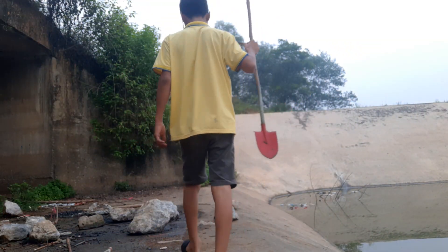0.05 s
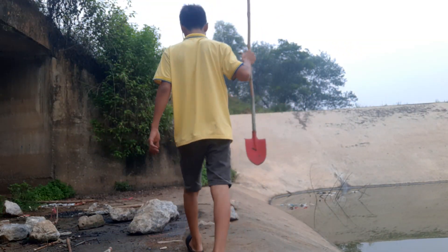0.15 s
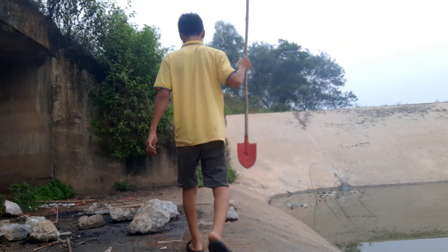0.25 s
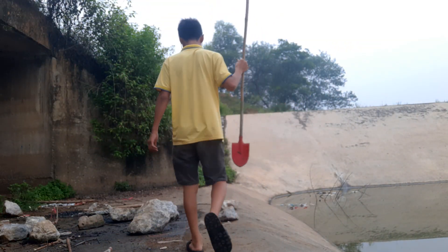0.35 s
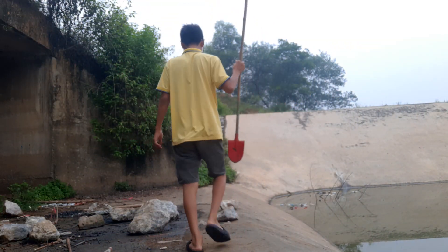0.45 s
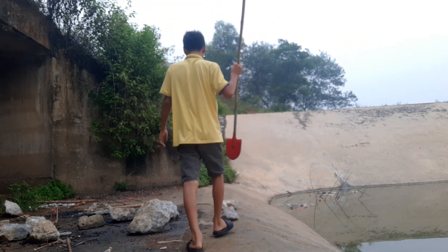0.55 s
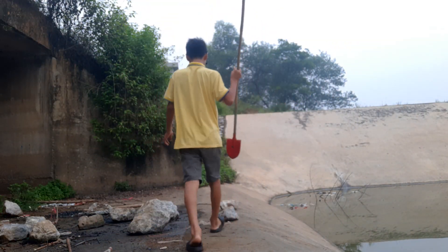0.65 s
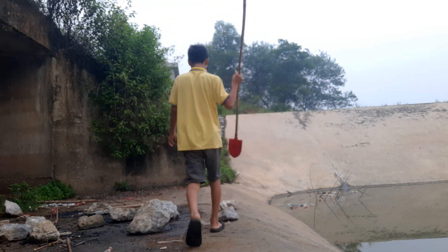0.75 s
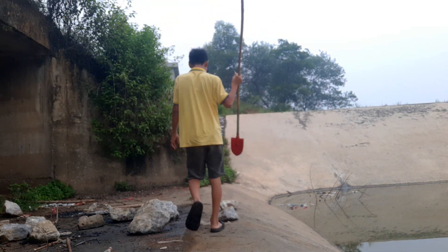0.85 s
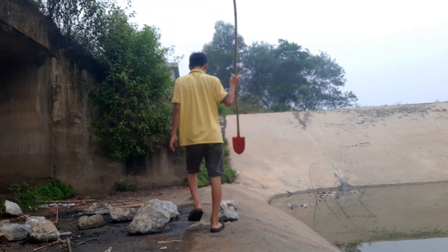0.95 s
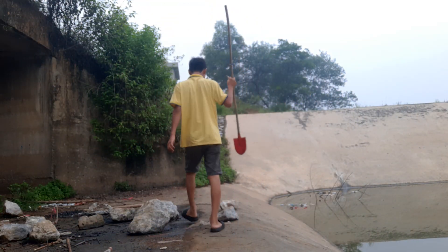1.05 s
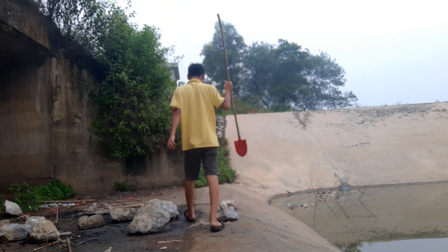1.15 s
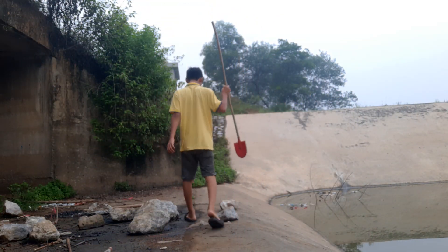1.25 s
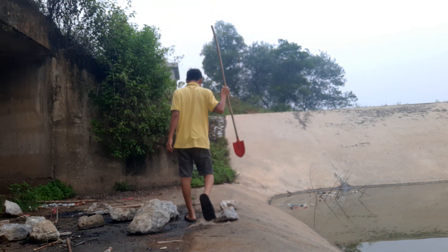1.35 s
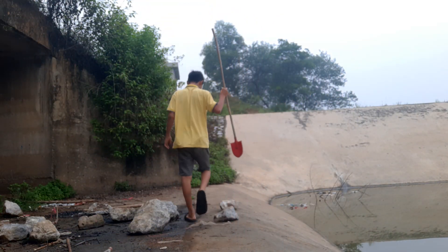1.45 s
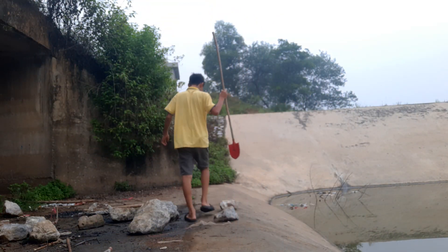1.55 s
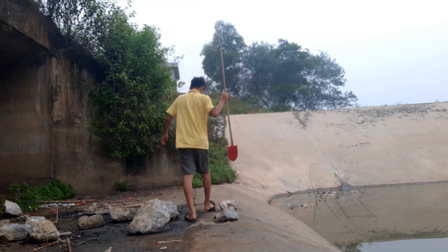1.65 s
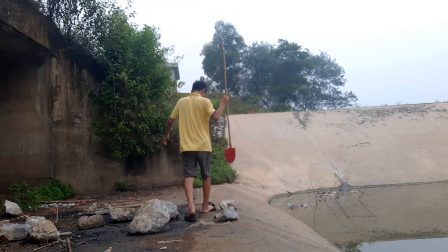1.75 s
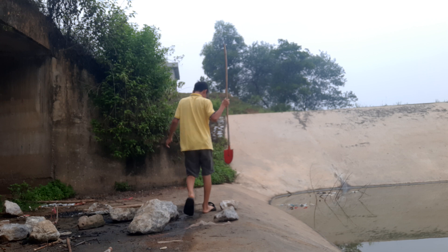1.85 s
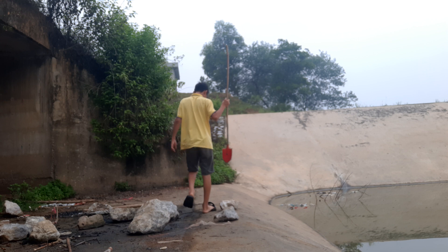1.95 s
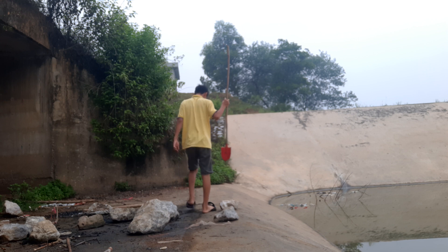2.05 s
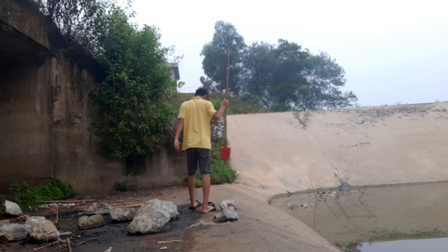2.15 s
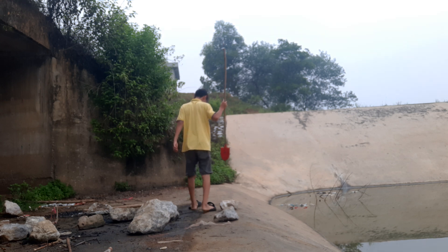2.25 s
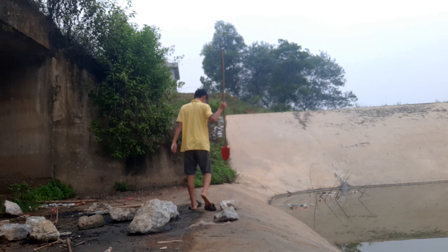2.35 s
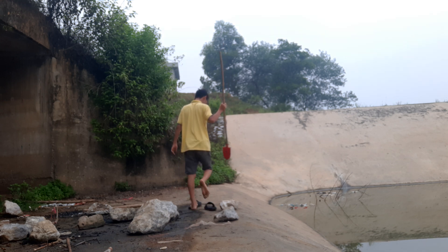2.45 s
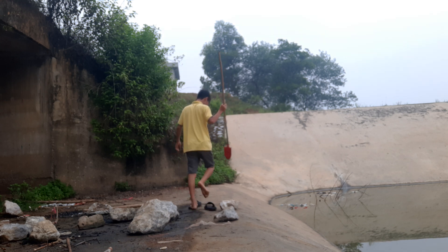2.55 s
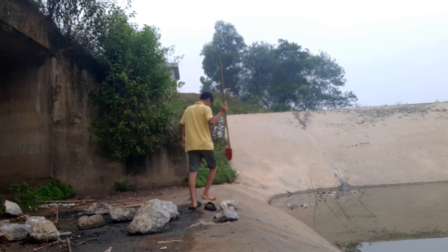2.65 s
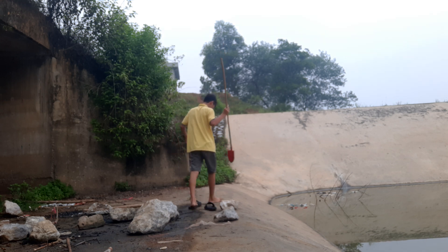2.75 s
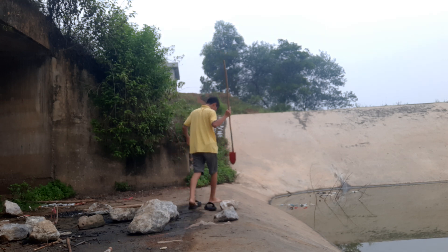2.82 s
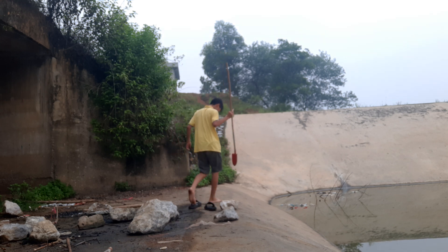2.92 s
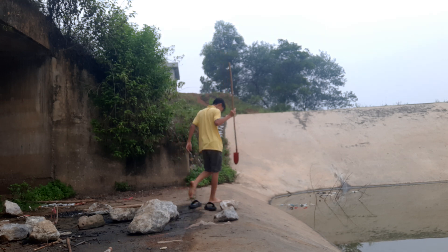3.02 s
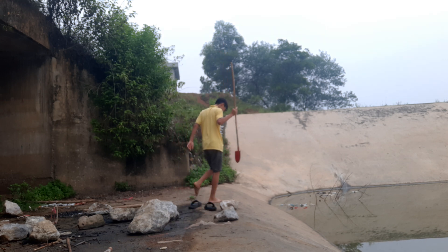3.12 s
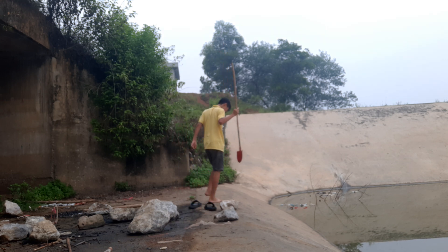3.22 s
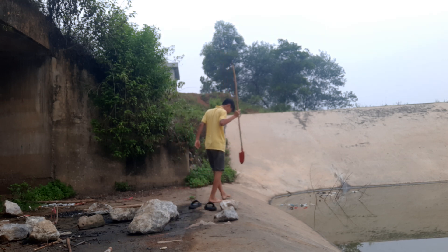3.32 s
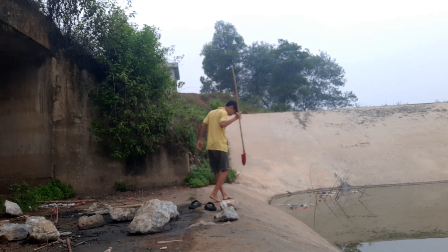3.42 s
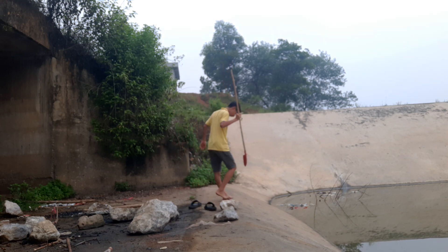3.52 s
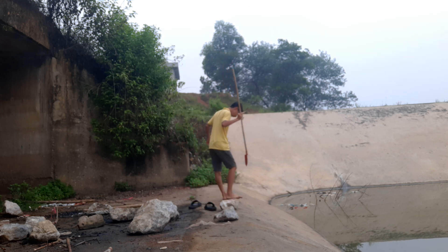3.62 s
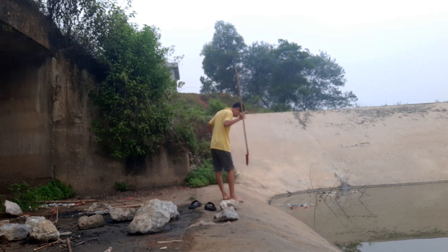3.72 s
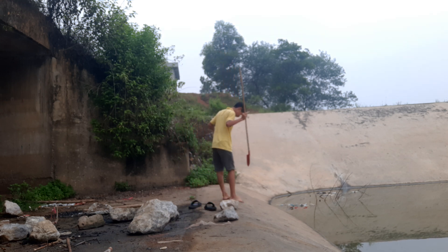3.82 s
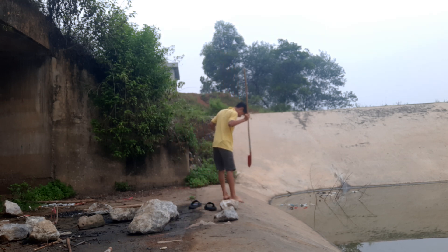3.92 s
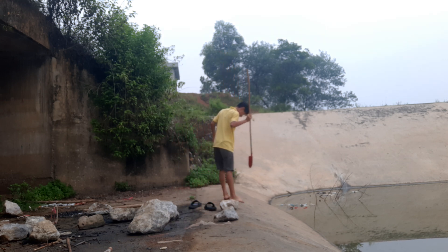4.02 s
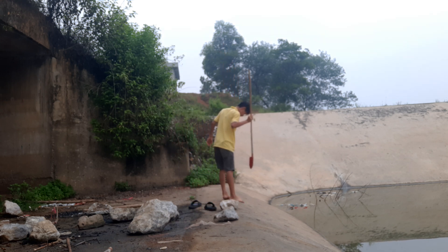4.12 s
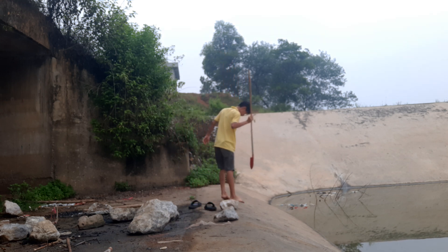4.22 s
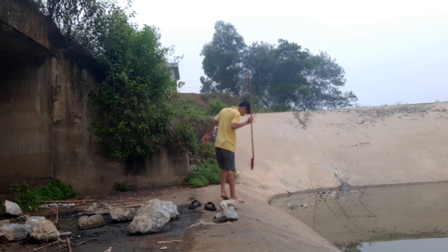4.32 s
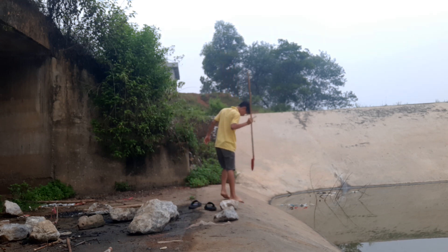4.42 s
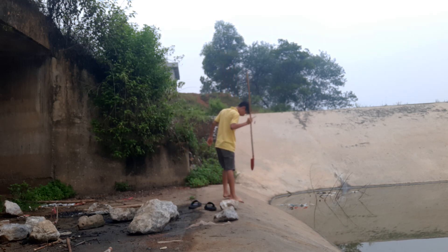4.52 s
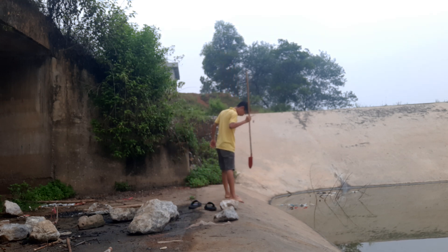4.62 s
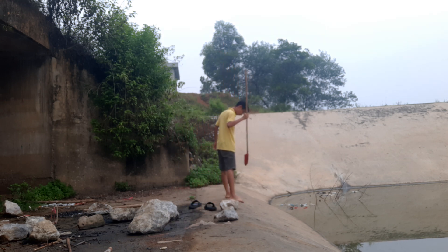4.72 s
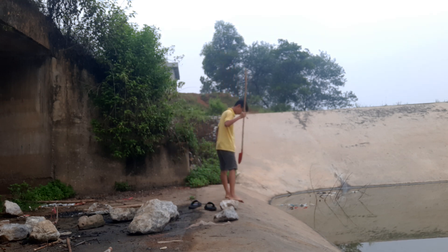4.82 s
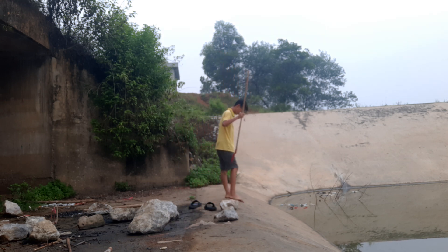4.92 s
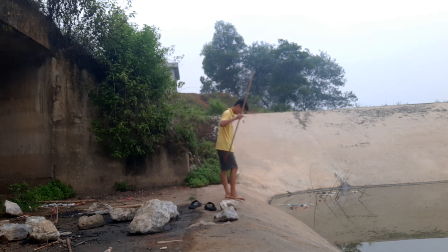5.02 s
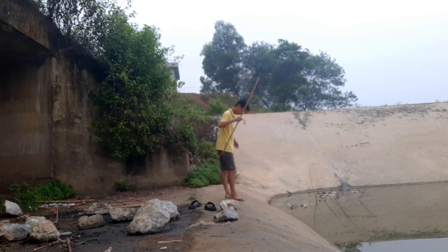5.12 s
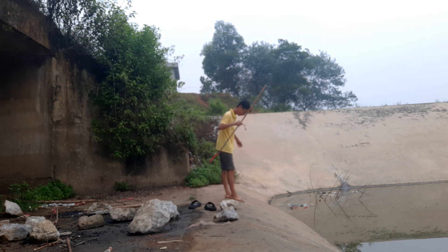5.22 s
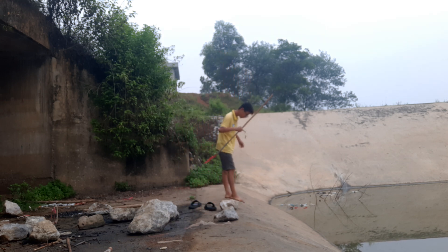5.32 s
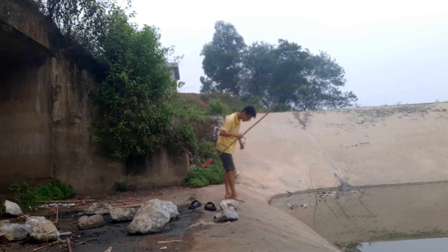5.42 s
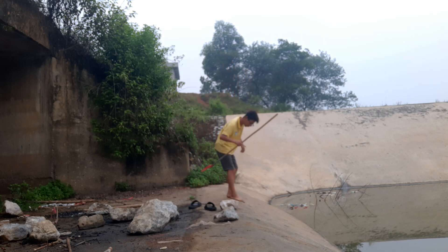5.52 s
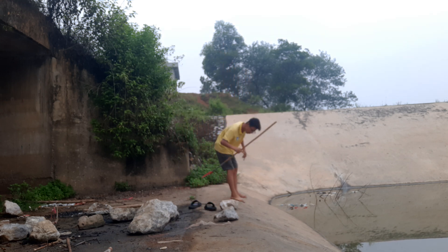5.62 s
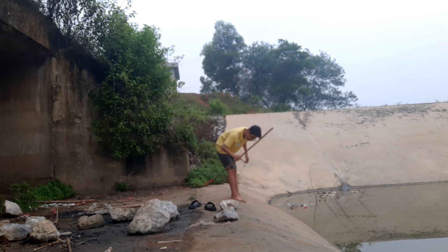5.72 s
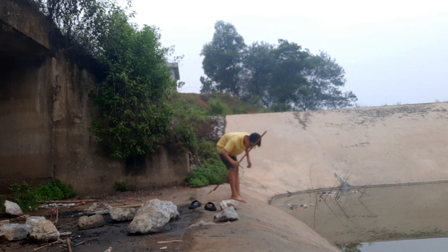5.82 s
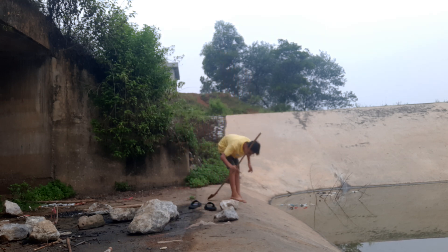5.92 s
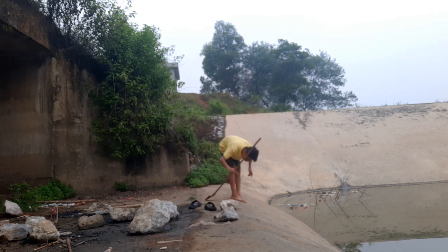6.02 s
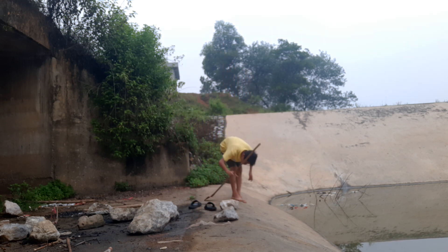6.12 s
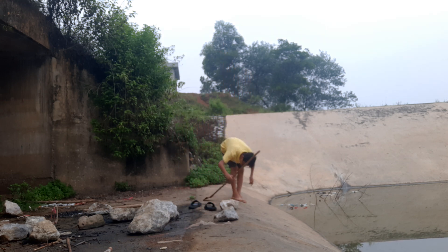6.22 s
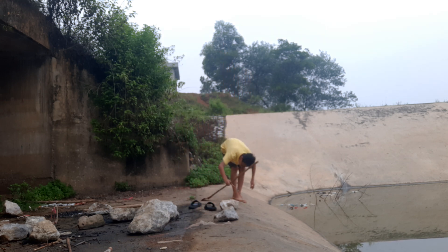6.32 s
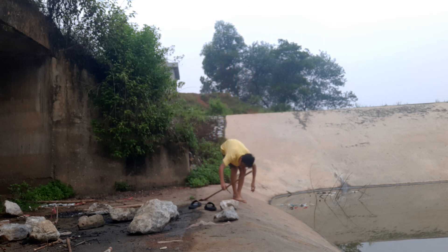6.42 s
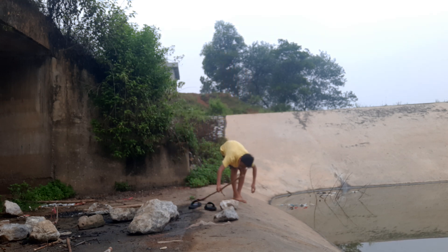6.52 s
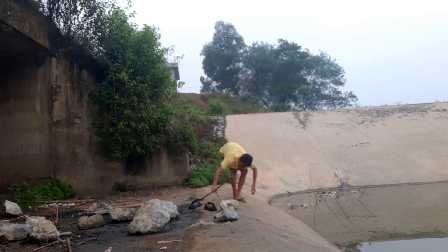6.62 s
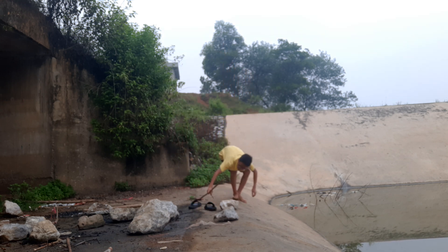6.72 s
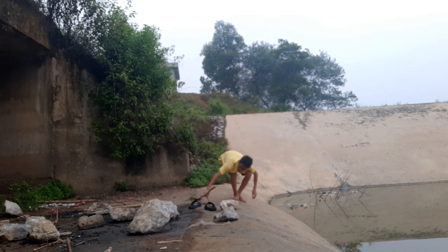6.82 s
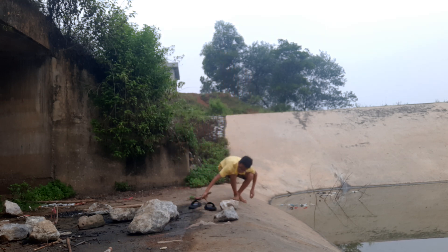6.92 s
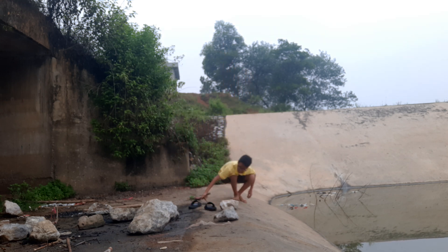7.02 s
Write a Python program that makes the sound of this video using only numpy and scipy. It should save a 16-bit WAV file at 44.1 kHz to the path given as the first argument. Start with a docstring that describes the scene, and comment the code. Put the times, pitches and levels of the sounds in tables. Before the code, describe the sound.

Sandals crunch away over gritty concrete outdoors, a stone knocks, then a steel shovel clanks and scrapes to rest as birds whistle.

```python
"""A steel shovel is set down on gritty concrete: its blade clanks, drags and rattles to rest,
ringing with every tiny blow. Before that, someone walks away in sandals: sand crunches,
rubber pats, pebbles clack, and a loose stone knocks underfoot and echoes off a spillway wall.
Birds whistle in the leaves and insects hiss, over a low hum and rumble."""
import sys
import numpy as np
from scipy import signal
from scipy.fft import rfft, irfft, next_fast_len
from scipy.io import wavfile
from scipy.ndimage import uniform_filter1d

SR = 44100
rng = np.random.default_rng(int(sys.argv[2]) if len(sys.argv) > 2 else 0)


def transcribe(signal):
    """Save signal, clipped to [-1, 1], as a 16-bit WAV file at the path in sys.argv[1]."""
    frames = np.atleast_2d(signal).T
    limited = np.clip(frames, -1, 1)
    pcm = np.round(limited * 32767).astype(np.int16)
    wavfile.write(sys.argv[1], SR, pcm)


N = 311787
TIME = np.arange(N) / SR


def amp(db):
    """Turns decibels into a number to multiply by."""
    return 10 ** (np.asarray(db) / 20)


def unit_level(x):
    """Scales a sound to an average power of 1."""
    return x / np.sqrt(np.mean(x ** 2) + 1e-20)


def curve_at(points, hz):
    """Looks up a curve of (pitch_hz, value) points at any pitch."""
    pitches, values = np.transpose(points)
    return np.interp(np.log(hz + 1), np.log(pitches + 1), values)


def add(mix, start_s, sound):
    """Mixes a sound in at its start time."""
    part = mix[round(start_s * SR):][:len(sound)]
    part += sound[:len(part)]


def click(tone, size=2048):
    """The shortest click with this tone, energy 1; convolving with it passes the tone on."""
    log_gain = np.log(amp(curve_at(tone, abs(np.fft.fftfreq(size, 1 / SR)))))
    spectrum = np.exp(np.conj(signal.hilbert(log_gain)))
    pulse = np.fft.ifft(spectrum).real[:size // 2]
    return pulse / np.linalg.norm(pulse)


def shaped(x, tone):
    """Turns lows and highs up or down along (pitch_hz, gain_db) points."""
    size = next_fast_len(x.shape[-1] + 4096)
    gain = amp(curve_at(tone, np.fft.rfftfreq(size, 1 / SR)))
    return irfft(rfft(x, size) * gain, size)[..., :x.shape[-1]]


def drift(per_s):
    """A random wander of about size 1 that turns per_s times a second."""
    turns = np.arange(0, N / SR + 1, 1 / per_s)
    return np.interp(TIME, turns, rng.standard_normal(len(turns)))


def grains(per_s, spread_db):
    """Random tiny impacts, a few much larger than the rest."""
    size = amp(spread_db * np.minimum(rng.exponential(1, N), 3.5))
    return unit_level(size * rng.choice([-1., 1.], N) * (rng.random(N) < per_s / SR))


def reflections(x, fade_s, echo_db, sway_hz=3.8):
    """Dense echoes, different left and right, shift as things move. Any fade_s is the time to drop 60 dB."""
    x = np.atleast_2d(x)
    t = np.arange(round(np.clip(fade_s, .01, .5) * SR)) / SR
    echo = np.zeros((2, N))
    for k in range(2):  # two sets of echoes take turns
        sign, place = rng.random((2, 2, SR // 2))[..., :len(t)]
        taps = np.sign(sign - .5) * (place < .15) * amp(-60 * t / fade_s) * (t > .0004)
        taps /= np.linalg.norm(taps, axis=1, keepdims=True)
        share = np.cos(np.pi * (sway_hz * TIME + k / 2))
        echo += signal.oaconvolve(x * share, taps, axes=1)[:, :N]
    return (x + amp(echo_db) * echo) / np.hypot(1, amp(echo_db))


def pan(x, left_db):
    """Makes the left side left_db louder than the right."""
    return x * amp(np.array([[left_db / 2], [-left_db / 2]]))


# how alike left and right are in open air: pitch_hz, likeness_0_to_1
SIDE_LIKENESS = [(100, 1), (300, 0.65), (1000, 0), (3000, 0), (10000, 0)]
def outdoor_noise(tone):
    """Noise from all around, alike on both sides only in the bass."""
    left, other = rfft(rng.standard_normal((2, next_fast_len(N))))
    hz = np.linspace(0, SR / 2, len(left))
    same = curve_at(SIDE_LIKENESS, hz)
    right = same * left + np.sqrt(1 - same ** 2) * other
    return unit_level(irfft(np.array([left, right]) * amp(curve_at(tone, hz)))[:, :N])


# notes of a distant hum, before the swell: pitch_hz, level_db
HUM_NOTES = [(61, -69.5), (121.5, -68.5), (181, -77.5)]
# tone of the outdoor rumble: pitch_hz, gain_db
RUMBLE_TONE = [(15, -66), (25, -30.5), (58, -11), (77, -2.5), (92, -12), (124, 0), (148, -9), (224, -11.5),
               (267, -19), (301, -19.5), (544, -33), (1170, -34), (2120, -40), (2800, -45), (3640, -78),
               (6160, -120)]
def hum_and_rumble():
    """A wavering hum and a low rumble swell and sink together."""
    hum = np.zeros(N)
    for hz, db in HUM_NOTES:
        phase = 2 * np.pi * np.cumsum(hz + 1.74 * drift(13)) / SR
        hum += amp(db + 2.4 * drift(11)) * np.sqrt(2) * np.sin(phase)
    swell = amp(np.interp(TIME, [0, .7, 2.2, 3.2, 5.4, 6.2, 7.0], [4.5, 1, -1.5, -3, -3, 2.5, -2]))
    return swell * (hum + amp(-61.5) * outdoor_noise(RUMBLE_TONE))


# tone of the insect chorus: pitch_hz, gain_db
INSECT_TONE = [(2400, -18.5), (3050, -17), (3450, 2.5), (3800, -5), (4500, 7.5), (5200, 5), (5700, -4),
               (6600, 0), (7500, -21), (9000, -1), (9900, -1.5), (10600, 8), (11700, -12.5), (15500, -17)]
def insects():
    """Many insects blend into a high hiss that flickers slightly."""
    return amp(-64 + .72 * drift(27)) * outdoor_noise(INSECT_TONE)


# tone of grit, here and in the footsteps: pitch_hz, gain_db
GRIT_TONE = [(100, -9), (250, 0.5), (500, -8), (1200, -6), (2800, 3.5), (4500, 1), (6500, 2), (7600, -11),
             (9000, -7.5), (10300, 8.5), (12000, 5.5), (13500, -5), (16000, -1)]
# loudness of the rustle: time_s, level_db
RUSTLE_LEVELS = [(0, -65.5), (.5, -60.5), (1.0, -74), (2.4, -66), (3.2, -76), (4.5, -72), (5.5, -79)]
def rustle(sway_db=2.5):
    """Clothes and grit rustle faintly, fading as the walker leaves."""
    level_db = np.interp(TIME, *np.transpose(RUSTLE_LEVELS)) + sway_db * drift(6.4)
    ticks = amp(level_db) * grains(1800, 4.1)
    return reflections(signal.oaconvolve(ticks, click(GRIT_TONE))[:N], fade_s=.08, echo_db=0)


def bird_chips(pitch_hz=6250, level_db=-60.5, gap_s=.1085, slowing_s=.00044):
    """A bird repeats a tiny high note, each gap a little longer than the last."""
    out = np.zeros(N)
    progress = np.linspace(0, 1, round(.02 * SR))
    for k in range(40):
        hz = pitch_hz * (1 + .025 * jitter(len(progress), smooth_samples=30))
        chip = unit_level(np.sin(2 * np.pi * np.cumsum(hz) / SR) * np.sin(np.pi * progress))
        add(out, .083 + k * (gap_s + k * slowing_s / 2), amp(level_db + rng.standard_normal()) * chip)
    return out


def jitter(samples, smooth_samples=110):
    """A fast random wobble of size 1."""
    return unit_level(uniform_filter1d(rng.standard_normal(samples), smooth_samples))


def whistle(length_s, from_hz, to_hz, bend, blur):
    """One falling note; bend under 1 drops early, blur (start, end) runs from 0, pure, to 1, buzzy."""
    progress = np.linspace(0, 1, round(length_s * SR))
    fall = (progress ** bend + np.sin(np.pi * progress ** bend / 2) ** 2) / 2  # eases in and out
    hz = (from_hz + (to_hz - from_hz) * fall) * (1 + .0065 * jitter(len(fall)))
    note = np.sin(2 * np.pi * np.cumsum(hz) / SR) * signal.windows.tukey(len(hz), .4)
    flutter = unit_level(shaped(rng.standard_normal(len(hz)), [(260, 0), (620, -9), (1500, -35)]))
    buzz = np.clip(np.linspace(*blur, len(hz)), 0, 1) ** 2
    return unit_level(note * (1 - buzz + buzz * flutter))


# high sliding bird calls: start_s, length_s, level_db, bend
HIGH_BIRD_CALLS = [(0.326, 0.18, -61.5, .9), (0.937, 0.17, -63.5, 1), (1.089, 0.18, -60, 1.4),
                   (1.338, 0.19, -61, .6), (2.328, 0.21, -62.5, 1), (2.609, 0.2, -62, .9),
                   (2.993, 0.19, -54.5, .55), (3.611, 0.18, -62.5, 1), (3.977, 0.12, -64, 1.1),
                   (4.357, 0.19, -62.5, .9), (4.479, 0.17, -63, 1.3), (5.26, 0.25, -64, .8),
                   (5.424, .2, -66, 1), (5.893, 0.19, -65.5, 1.6)]
# lower falling whistles: start_s, level_db
LOW_BIRD_CALLS = [(.608, -57.5), (0.849, -68.5), (1.194, -53.5), (1.719, -52), (2.262, -52.5),
                  (2.688, -72.5), (3.138, -72.5), (3.649, -74.5), (4.089, -74), (4.565, -72)]
def bird_calls(clear_db=-52, blur_per_db=.045):
    """Birds whistle falling notes; fainter calls come from deeper in the leaves and are more blurred."""
    out = np.zeros(N)
    for s, length_s, db, bend in HIGH_BIRD_CALLS:  # they start buzzy and clear as they fall
        note = whistle(length_s, 6650, 4450, bend, blur=(1, blur_per_db * (clear_db - db)))
        fade = amp(np.linspace(0, -3, len(note)))
        add(out, s, amp(db) * unit_level(note * fade))
    for s, db in LOW_BIRD_CALLS:
        blur = .3 + blur_per_db * (clear_db - db)
        add(out, s, amp(db) * whistle(.095, 4020, 2553, bend=1.05, blur=(blur, blur + .22)))
    for k in range(3):  # steep sweeps
        add(out, 1.045 + k * .533, amp(-56) * whistle(.027, 5500, 2860, bend=1.1, blur=(.49, .78)))
    for k in range(10):  # a quick twitter
        note = whistle(.035, 5500, 4700, bend=.98, blur=(.46, .39))
        add(out, 4.7 + k * .056 + .009 * rng.standard_normal(), amp(-68) * note)
    return out


# the clearest clacks of small stones: start_s, pitch_hz, level_db
PEBBLE_CLACKS = [(.798, 1225, -48), (2.245, 1380, -39.5), (5.986, 870, -47), (6.557, 1120, -36)]
def pebbles(fade_s=.037, stray_count=13, stray_until_s=2.3):
    """Small stones ring briefly under feet and blade; fainter strays are kicked along the way."""
    t, out = np.arange(SR // 12) / SR, np.zeros(N)
    strays = [(stray_until_s * (k + when) / stray_count, 1300 * 2 ** (.5 * (pitch - .5)), -69 + 8 * force)
              for k, (when, pitch, force) in enumerate(rng.random((stray_count, 3)))]
    for s, hz, db in PEBBLE_CLACKS + strays:
        roughness = 1 + amp(-5) * jitter(len(t))
        add(out, s, amp(db - 60 * t / fade_s) * roughness * np.sin(2 * np.pi * hz * t))
    return out


def bursts(contacts, impacts, rise, release):
    """Each contact presses out a burst of impacts; heavy contact adds bass, sharp contact treble."""
    out = np.zeros(N)
    for s, length_s, db, bass_db, treble_db in contacts:
        part = impacts[round(s * SR):][:round(2 * length_s * SR)]
        age = np.linspace(0, 2, len(part))  # counted in contact lengths, like rise and release
        pressure = np.minimum(age / rise, 1) * np.exp(-np.maximum(age - .5, 0) / release)
        burst = amp(db) * unit_level(part * pressure) / np.sqrt(2)
        tone = [(600, bass_db), (1700, 0), (3800, 0), (10000, treble_db)]
        add(out, s - 512 / SR, shaped(np.pad(burst, 512), tone))
    return out


# steps, where roll_s is the time from heel to sole: start_s, roll_s, heel_db, sole_db, toe_db, treble_db
FOOTFALLS = [(0.154, 0.044, -30.5, -35, -39, -2.5), (0.698, 0.054, -48.5, -46, -62.5, -4),
             (1.229, 0.072, -51.5, -49.5, -73, -3), (1.7, 0.0395, -39.5, -32, -46, -8.5),
             (2.177, 0.052, -49, -39.5, -62, -11.5), (5.78, .04, -59.5, -73, -76, -8)]
# heel, sole and toe landing in turn: delay_in_rolls, length_in_rolls, bass_db
FOOT_ROLL = [(0, 0.62, 1.5), (1, 0.73, -3.5), (2.65, 0.89, -5)]
def footstep_crunch():
    """Sand crunches in clumps under heel, sole and toe."""
    sand = grains(2200, 5.4) * amp(2.3 * drift(160))
    scuffs = [(s + delay * roll_s, length * roll_s, db, bass_db, treble_db)
              for s, roll_s, *levels, treble_db in FOOTFALLS
              for (delay, length, bass_db), db in zip(FOOT_ROLL, levels)]
    return signal.oaconvolve(bursts(scuffs, sand, rise=.3, release=.96), click(GRIT_TONE))[:N]


# grains cracking: start_s, energy_db, treble_db
GRIT_SNAPS = [(0.166, -1, 16), (.23, -16, 4), (0.417, -24.5, -9), (.702, -22.5, -11), (0.724, -22, -7),
              (1.348, -18.5, -8), (1.651, -17, -10.5), (1.924, -18, 7), (3.929, -18, -16.5)]
# tone of one crack: pitch_hz, gain_db
SNAP_TONE = [(200, -22), (1500, -29), (2600, -15), (3800, 7), (6200, 1.5), (7700, -6), (10300, 11.5),
             (12500, 9), (16000, -0.5)]
def grit_snaps(fade_s=.0043):
    """Single grains crack underfoot in a tiny burst of noise."""
    t, out = np.arange(SR // 10) / SR, np.zeros(N)
    for s, db, treble_db in GRIT_SNAPS:
        tone = [(hz, gain_db + treble_db * (hz > 7000)) for hz, gain_db in SNAP_TONE]
        crumble = rng.standard_normal(len(t)) * amp(-60 * t / fade_s)
        add(out, s, amp(db) * signal.fftconvolve(crumble / np.linalg.norm(crumble), click(tone)))
    return out


# sandals landing: start_s, relative_level_db
SANDAL_PATS = [(.183, -49), (0.379, -54.5), (0.867, -60), (1.777, -48.5), (1.958, -55.5), (2.179, -54)]
# tone of the rubber: pitch_hz, gain_db
RUBBER_TONE = [(100, -11), (200, 6), (330, -7), (680, 1), (1100, -8), (2500, -22), (8000, -41)]
def sandal_pats(rise_s=.0031, fade_s=.053, boost_db=6):
    """Rubber sandals land with a soft, dull pat."""
    t, out = np.arange(SR // 10) / SR, np.zeros(N)
    for s, db in SANDAL_PATS:
        push = rng.standard_normal(len(t)) * np.minimum(t / rise_s, 1) * amp(db - 60 * t / fade_s)
        add(out, s, signal.fftconvolve(push, click(RUBBER_TONE)))
    return amp(boost_db) * out


# notes the stone rings with on its bed: pitch_hz, fade_s, relative_level_db
STONE_NOTES = [(136, .1, -9), (305, 0.14, -1), (423, 0.073, -3), (632, 0.11, -11), (933, 0.04, -7),
               (1126, .032, 0), (1350, 0.025, 3), (1370, 0.029, 3), (3710, 0.027, 2)]
# tone of grit breaking under it: pitch_hz, gain_db
CRACK_TONE = [(150, -16), (300, -2), (1300, 1), (2600, -13), (3700, -4.5), (6500, 0), (7700, -13),
              (9700, 5.5), (12000, 3), (15500, -7)]
# tone of its dull landing: pitch_hz, gain_db
THUD_TONE = [(90, -21), (140, -7), (220, -9), (300, 0), (420, -1), (520, -8), (650, 2), (780, -6), (950, 1),
             (1300, 4.5), (1600, -18.5), (2600, -17.5), (5000, -37)]
def loose_stone(tip_s=4.3327, rock_back_s=4.376, echo_delay_s=.39):
    """A stone tips onto concrete with a crack and a hollow thud, rocks back, and echoes off the far wall."""
    t, knock = np.arange(SR // 3) / SR, np.zeros(N)
    for s, db, rise_s in [(tip_s, 0, .0002), (rock_back_s, -12, .016)]:
        ring = sum(amp(note_db - 60 * t / fade_s) * np.sin(2 * np.pi * (hz * t + rng.random()))
                   for hz, fade_s, note_db in STONE_NOTES)
        crush, push = rng.standard_normal((2, len(t)))
        crack = signal.fftconvolve(crush * amp(-60 * t / .076), click(CRACK_TONE))[:len(t)]
        thud = signal.fftconvolve(push * amp(-60 * t / .081), click(THUD_TONE))[:len(t)]
        landing = (amp(-30) * ring + amp(-28) * thud) * (1 - np.exp(-t / .0011))
        add(knock, s, amp(db - 27) * crack * np.minimum(t / rise_s, 1))
        add(knock, s + .0018, amp(db) * landing)  # the grit breaks first, then the weight lands
    delayed = np.roll(knock, round(echo_delay_s * SR))
    muffled = shaped(delayed, [(200, -9.5), (420, 5), (900, -14), (3000, -39.5)])
    echo = amp(-29) * reflections(muffled, fade_s=.77, echo_db=5.3)
    left = shaped(knock, [(2000, -.5), (4000, -13), (9000, 3.5)])
    right = shaped(knock, [(2000, .038), (4000, .82), (9000, .37)])
    return reflections([left, right], fade_s=.4, echo_db=-18) + echo


def blade_pressure(curve, lift_s=.018):
    """Follows (time_s, level_db) points; the contact fades quickly before and after them."""
    s, db = np.transpose(curve)
    outside_s = np.maximum(np.maximum(s[0] - TIME, TIME - s[-1]), 0)
    return amp(np.interp(TIME, s, db) - 60 * outside_s / lift_s)


# the blade hitting the ground: start_s, level_db, relative_bounce_db, bass_db, treble_db
BLADE_STRIKES = [(5.967, -23.5, 0.5, 4, -5), (6.056, -34, -14, -3, 7.5), (6.133, -35, -20, -20, 3.5),
                 (6.508, -25.5, -12, -22, -6), (6.595, -36, 1, 9.5, -12), (6.654, -38, -13, 5.5, -3),
                 (6.711, -26.5, -10.5, -15, -5), (6.778, -31.5, -12, -9, -4), (6.807, -31, -1.5, -13, -7),
                 (6.878, -36.5, -1, 4, 3)]
# pressure in the long drag: time_s, level_db
DRAG_PRESSURE = [(6.06, -33.5), (6.098, -35), (6.158, -35), (6.17, -44), (6.2, -42.5), (6.35, -28),
                 (6.552, -33.5), (6.59, -43)]
# pressure in the last slide to rest: time_s, relative_level_db
SETTLE_PRESSURE = [(6.715, -34.5), (6.775, -35), (6.783, -32.5), (6.797, -41.5), (6.823, -33.5),
                   (6.863, -41), (6.887, -31), (7.047, -52.5), (7.06, -47)]
def blade_blows(contact_s=.017, bounce_s=.0186):
    """The shovel's edge strikes and chatters over the stones in the concrete."""
    # fine sand hisses while coarser gravel catches in fits
    sand = shaped(grains(5000, 2.7), [(1500, -5), (6000, -4), (10000, -2)])
    catches = unit_level(grains(600, 2.3) * amp(1.5 * drift(70)))
    gravel = shaped(catches, [(500, -5.5), (1800, -1), (6000, -5), (10000, -3.5)])
    chatter = (sand + gravel) * amp(drift(170))
    # the edge never quite leaves the ground
    graze = amp(-51) * (TIME > BLADE_STRIKES[0][0]) * (TIME < SETTLE_PRESSURE[0][0])
    drag = chatter * (blade_pressure(DRAG_PRESSURE) + graze)
    # lying flat, the blade grinds lower
    settle = shaped(chatter * amp(-2) * blade_pressure(SETTLE_PRESSURE), [(750, 6), (1700, 0), (10000, -.28)])
    # each strike grinds briefly, then the blade lands again
    contacts = [(s + delay_s, contact_s, db + extra_db, bass_db, treble_db)
                for s, db, bounce_db, bass_db, treble_db in BLADE_STRIKES
                for delay_s, extra_db in [(0, 0), (bounce_s, bounce_db)]]
    return drag + settle + bursts(contacts, grains(6000, 2.9), rise=.057, release=.48)


# clear notes of the steel blade: pitch_hz, fade_s, relative_peak_db
BLADE_NOTES = [(1270, .09, -3), (1855, .14, -1), (2250, .06, -4), (2828, .22, 1), (3038, .35, 8),
               (3222, .15, -1), (3355, .15, -3), (3730, .15, 4), (4220, .08, -3), (4540, .14, 4),
               (4770, .14, 4), (5264, .14, 1), (5970, .12, -4), (6195, .2, -7), (7700, .06, -12),
               (9334, .15, -3), (10001, .12, -1), (10276, .12, 4), (10581, .12, 4), (11171, .12, 6),
               (11389, .12, 0), (11684, .15, 5), (12200, .06, -2)]
# tone of the crowded notes between them: pitch_hz, gain_db
STEEL_TONE = [(100, -27), (300, -15), (900, -10), (1250, -2.5), (1600, -5.5), (2200, 1.5), (5000, 1.5),
              (6800, -2), (7900, -21), (9300, -6), (10400, 3.5), (12000, 2), (13600, -5.5), (15500, -13)]
def shovel(ring_db=5, clatter_db=-2):
    """Every tiny blow rings the steel blade; its moving point of contact favours changing notes."""
    blows = blade_blows()
    t, ring = np.arange(SR // 2) / SR, np.zeros(N)
    for hz, fade_s, db in BLADE_NOTES:
        strength = 2 * np.log(1000) / (fade_s * SR)  # a longer ring needs less push for the same peak
        note = strength * amp(ring_db + db - 60 * t / fade_s) * np.cos(2 * np.pi * hz * t)
        ring += signal.oaconvolve(blows * amp(2.5 * drift(12)), note)[:N]
    # the crowded notes die quickly and shift as the blade turns
    clatter = amp(clatter_db) * signal.oaconvolve(blows, click(STEEL_TONE))[:N]
    return reflections(clatter, fade_s=.04, echo_db=3, sway_hz=4) + ring


def scene():
    """Leaves blur the birds, and concrete walls faintly throw back the sounds on the ground."""
    background = hum_and_rumble() + insects() + rustle()
    birds = pan(reflections(bird_chips() + bird_calls(), fade_s=.46, echo_db=1), -1.4)
    feet = pan(footstep_crunch() + sandal_pats(), .5) + pan(grit_snaps(), -1.2)
    steps = reflections(feet, fade_s=.03, echo_db=0)
    ground = reflections(pebbles() + steps + shovel(), fade_s=.3, echo_db=-15)
    return background + birds + ground + loose_stone()


# balance of the two microphone openings: pitch_hz, left_minus_right_db
MIC_BALANCE = [(60, 2.5), (400, 2.5), (1200, 0.5), (2400, -1.5), (3600, -4), (5000, -6), (6500, -14),
               (7500, 3.5), (8600, 12), (10500, 21.5), (12000, 17.5), (15000, 5.5)]
def record(dry, top_hz=16000):
    """The left side is bright in the top treble, the right in the upper middle; both stop at top_hz."""
    left = [(hz, 20 * np.log10(2 / (1 + amp(-db)))) for hz, db in MIC_BALANCE]
    right = [(hz, 20 * np.log10(2 / (1 + amp(db)))) for hz, db in MIC_BALANCE]
    heard = np.array([shaped(dry[0], left), shaped(dry[1], right)])
    low_pass = signal.firwin(511, top_hz, window=("kaiser", 9), fs=SR)
    return signal.oaconvolve(heard, low_pass[None], "same")


dry = scene()
out = record(dry)
transcribe(out)
```